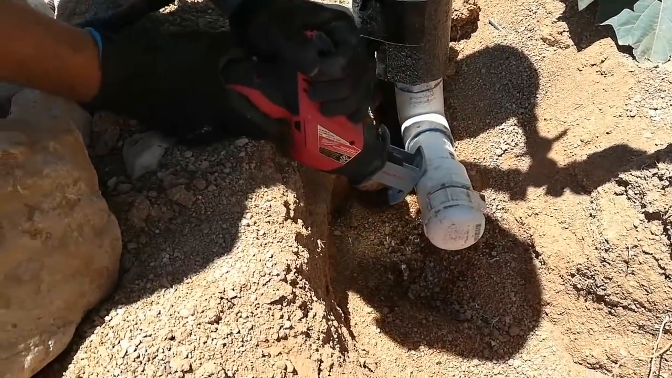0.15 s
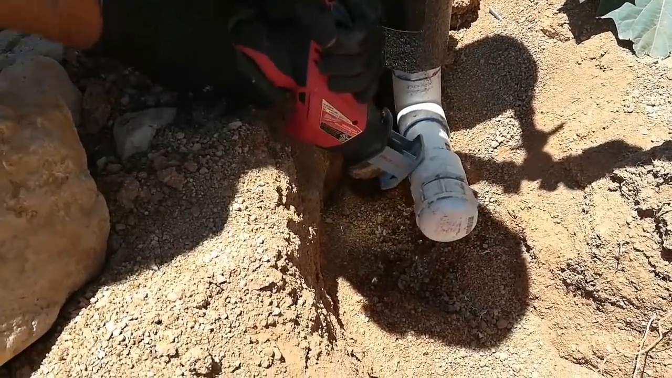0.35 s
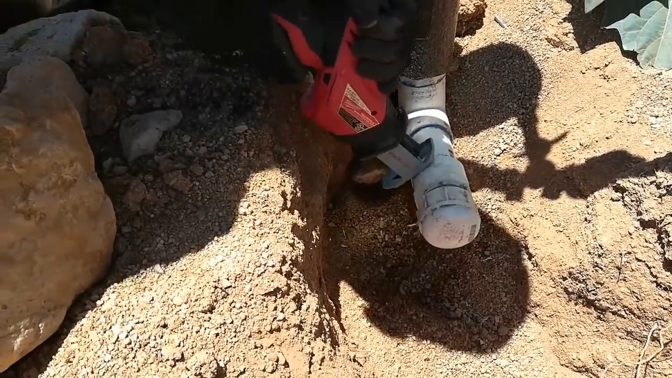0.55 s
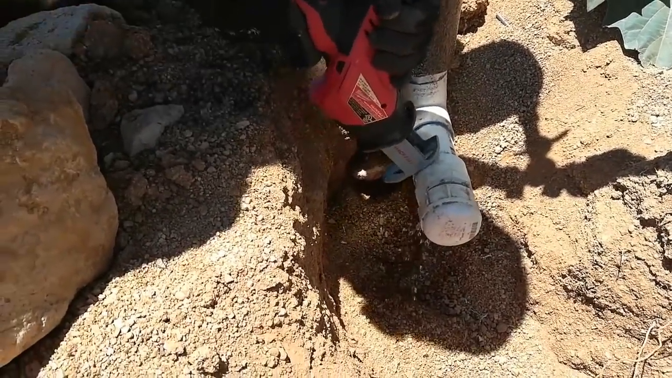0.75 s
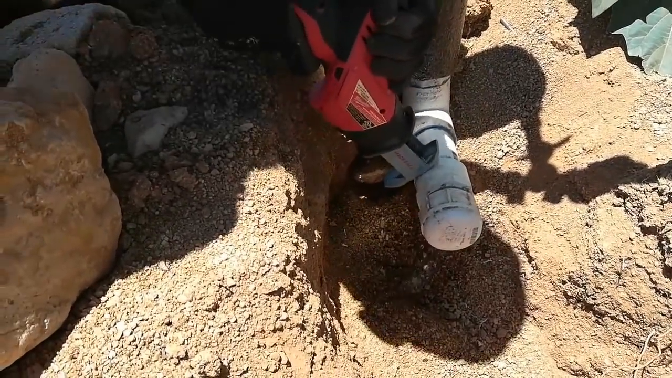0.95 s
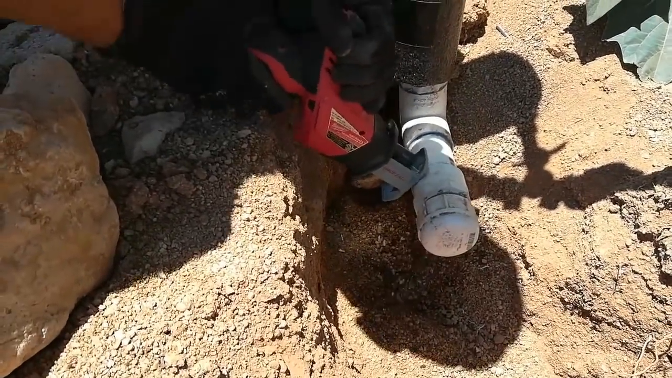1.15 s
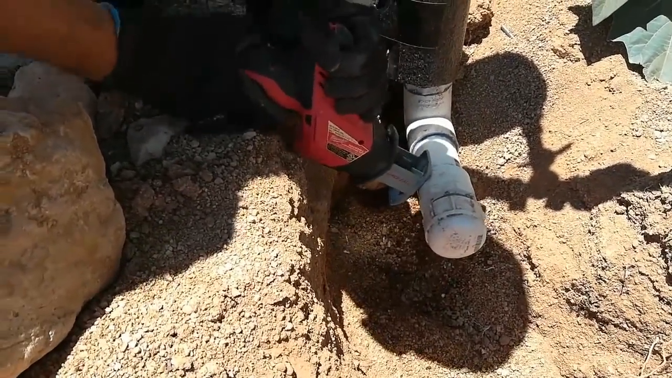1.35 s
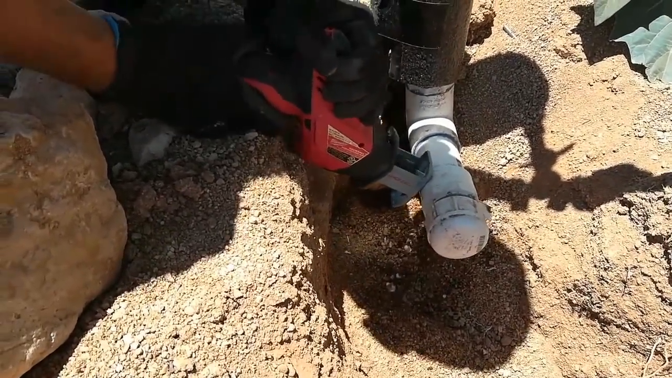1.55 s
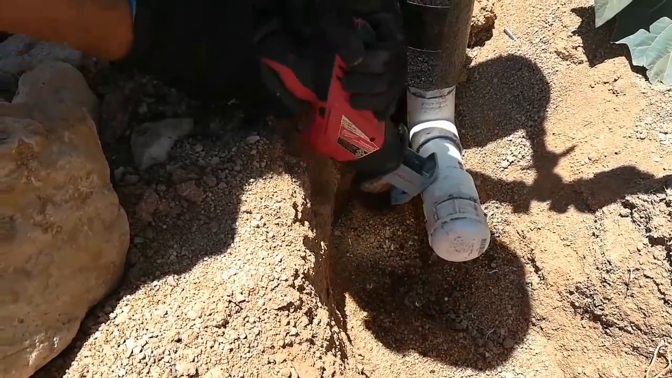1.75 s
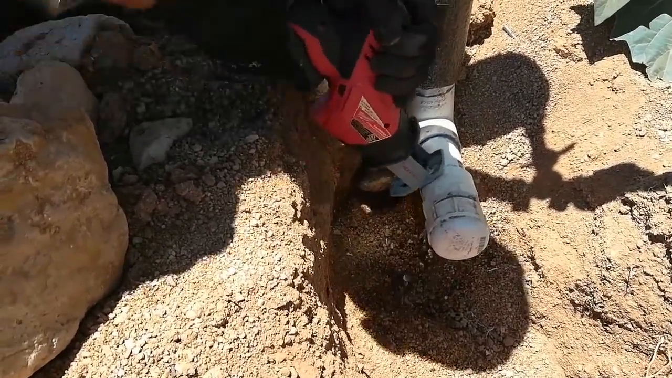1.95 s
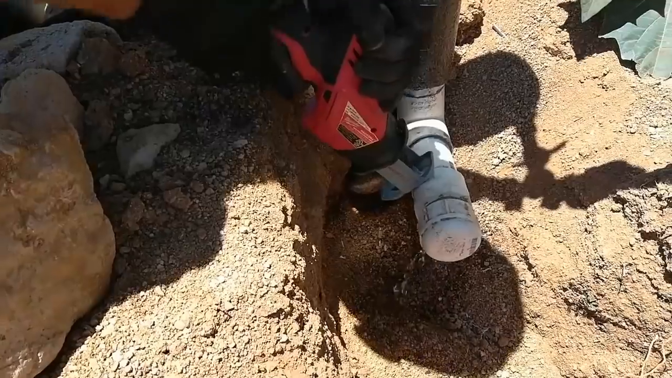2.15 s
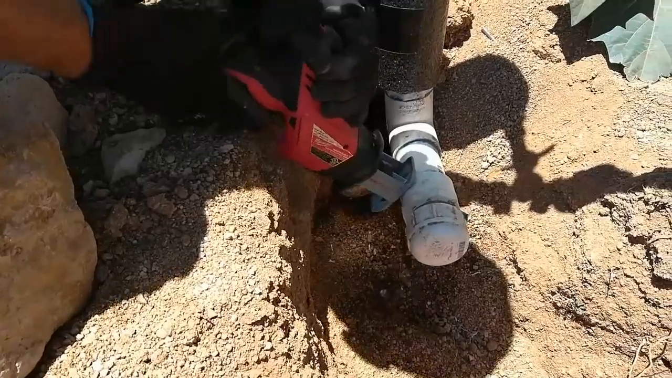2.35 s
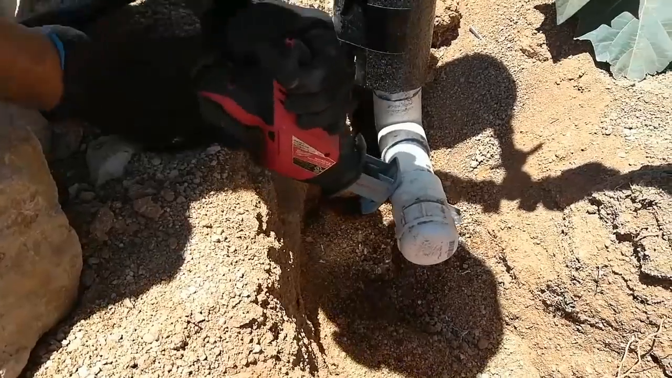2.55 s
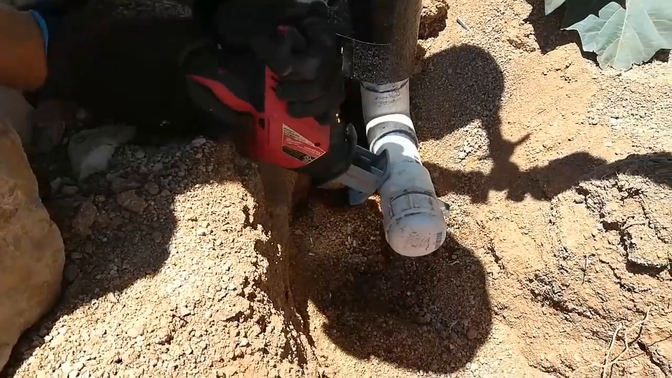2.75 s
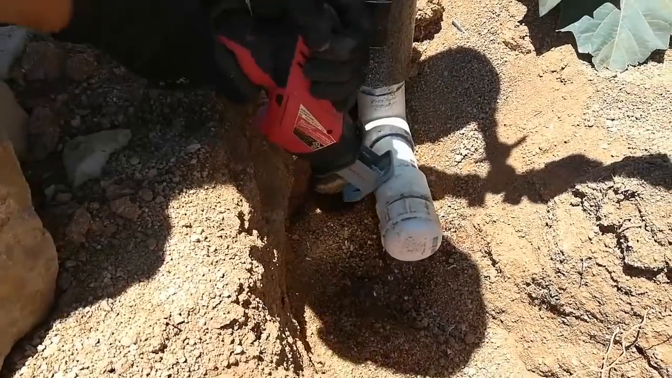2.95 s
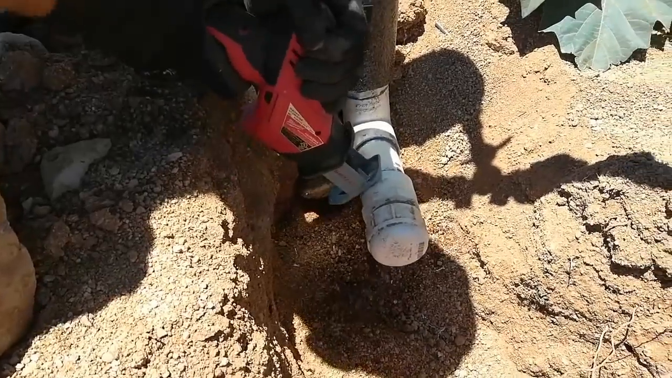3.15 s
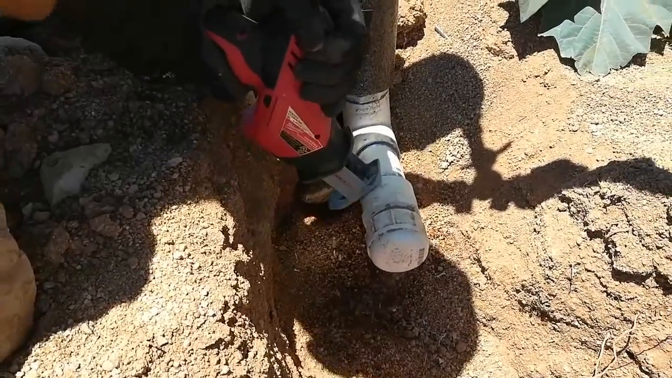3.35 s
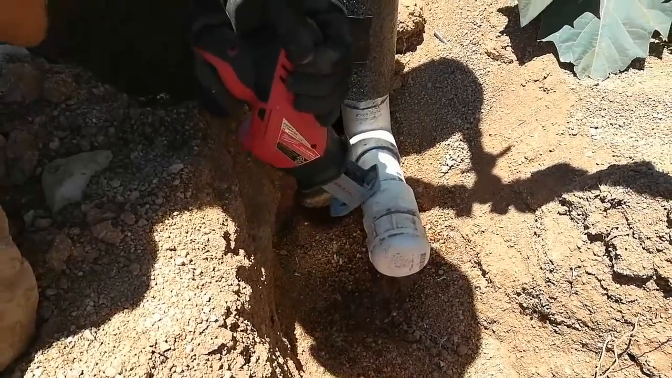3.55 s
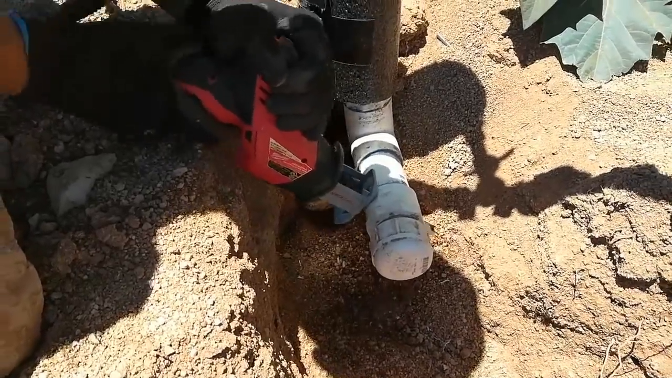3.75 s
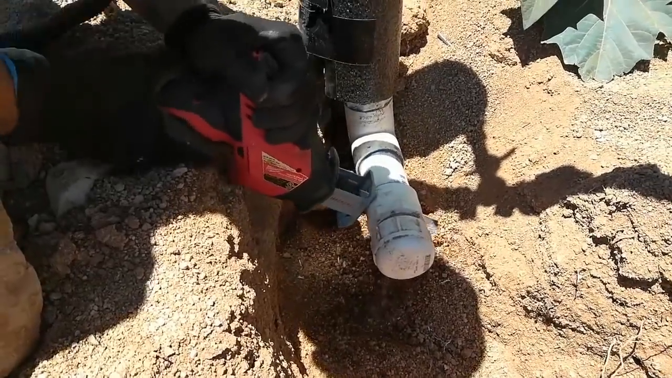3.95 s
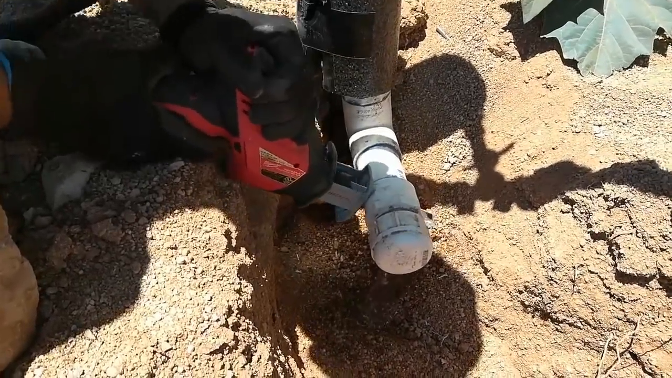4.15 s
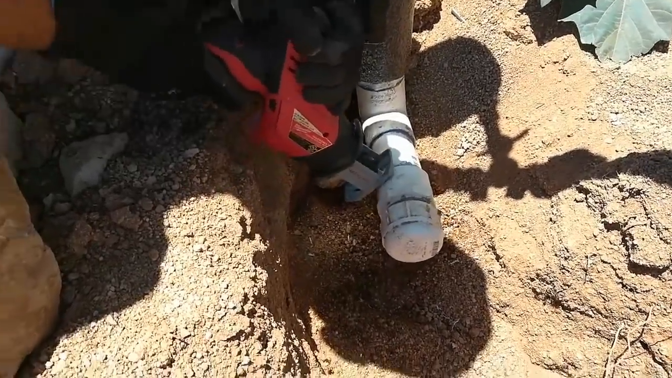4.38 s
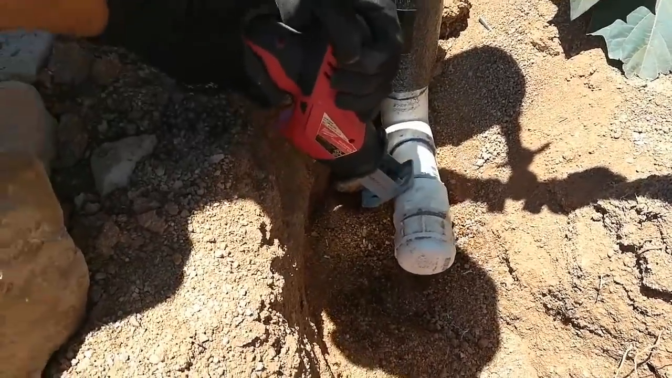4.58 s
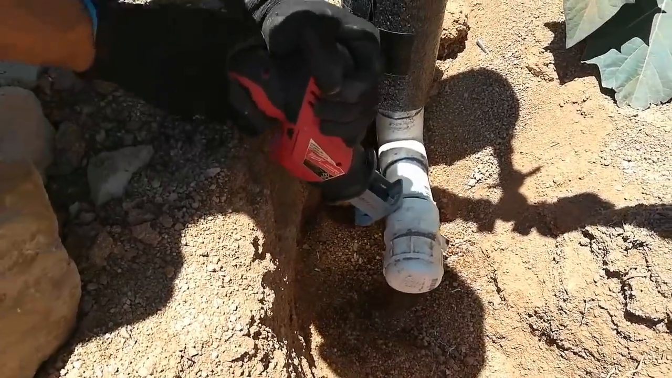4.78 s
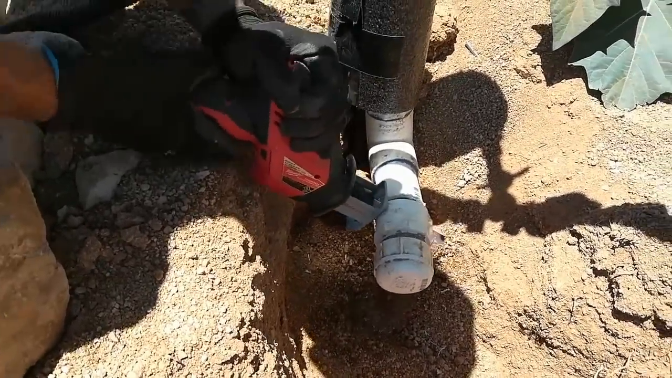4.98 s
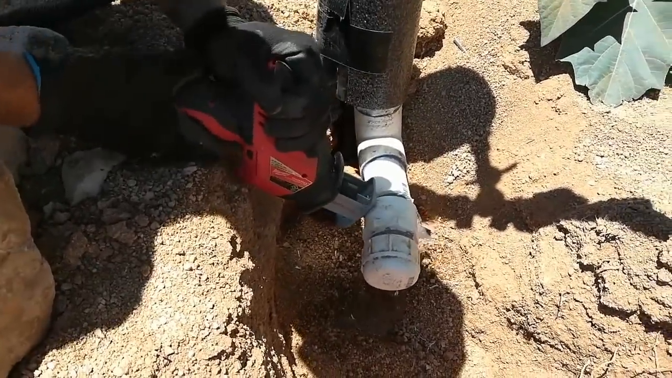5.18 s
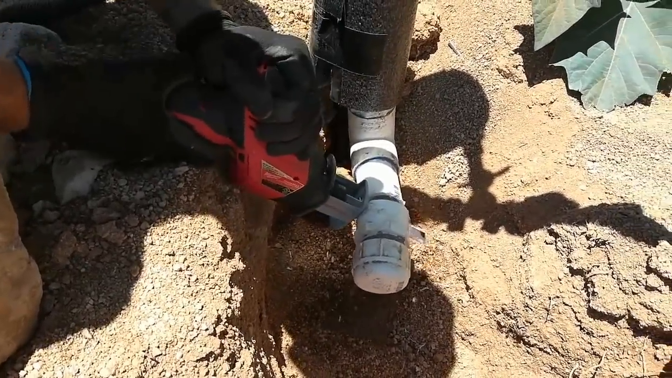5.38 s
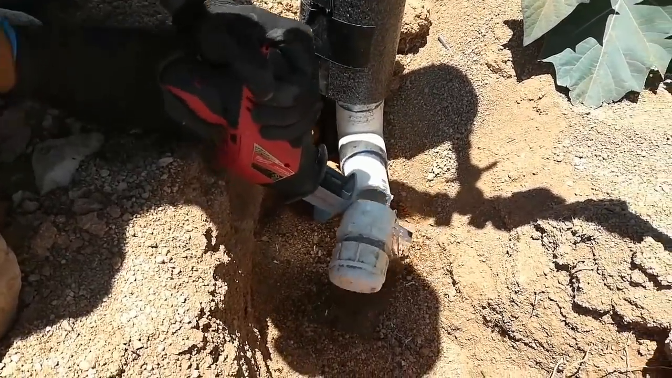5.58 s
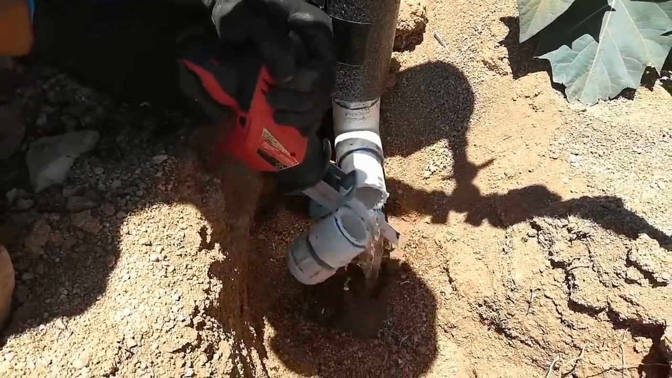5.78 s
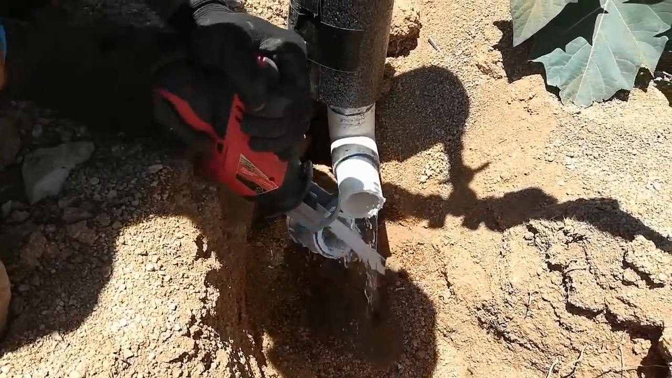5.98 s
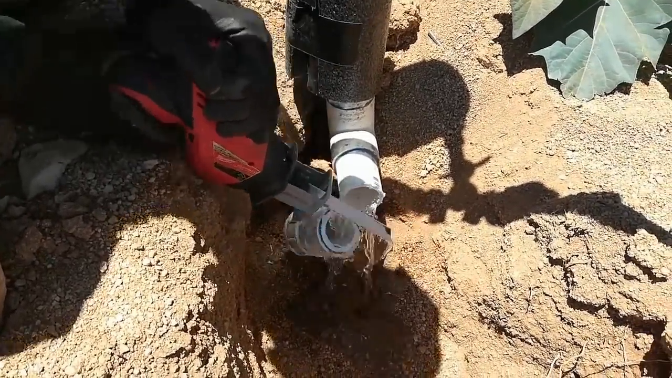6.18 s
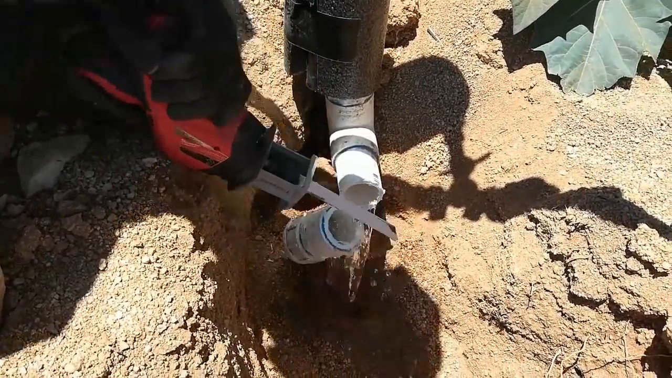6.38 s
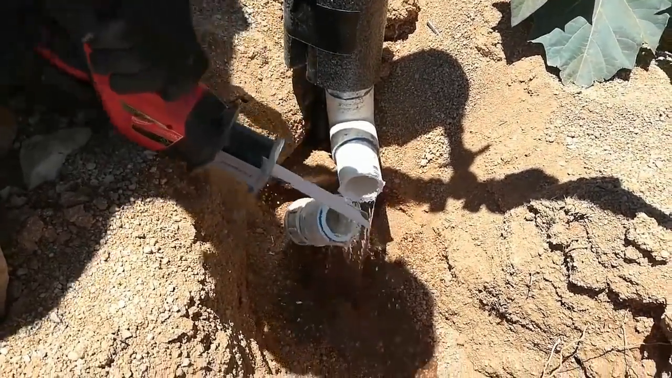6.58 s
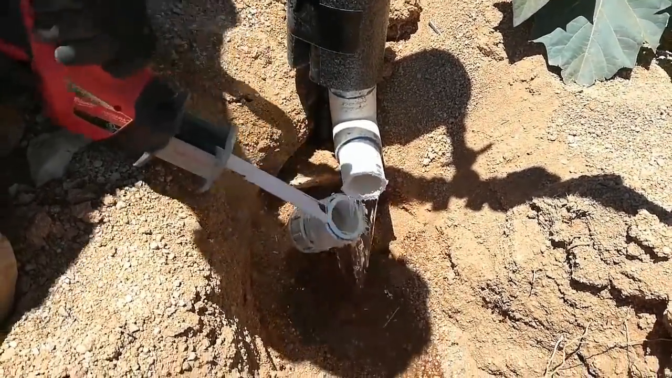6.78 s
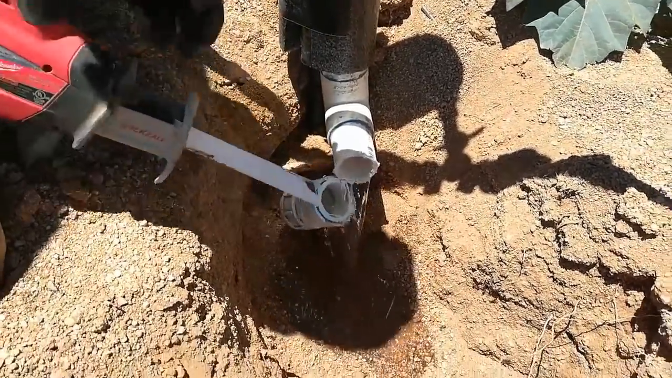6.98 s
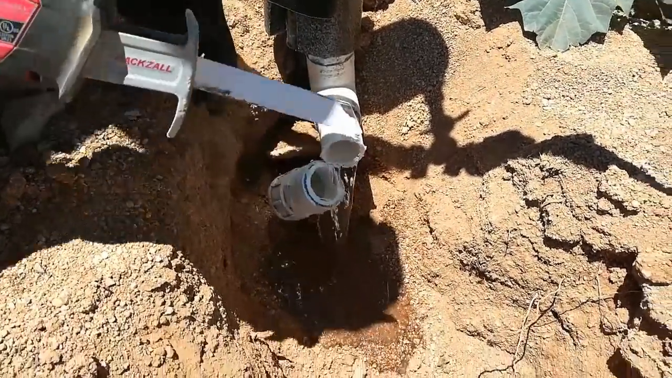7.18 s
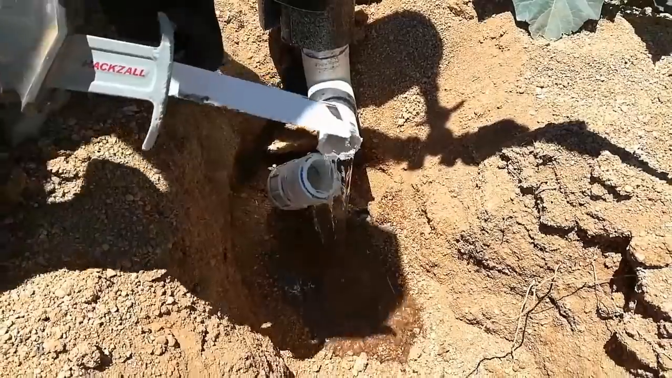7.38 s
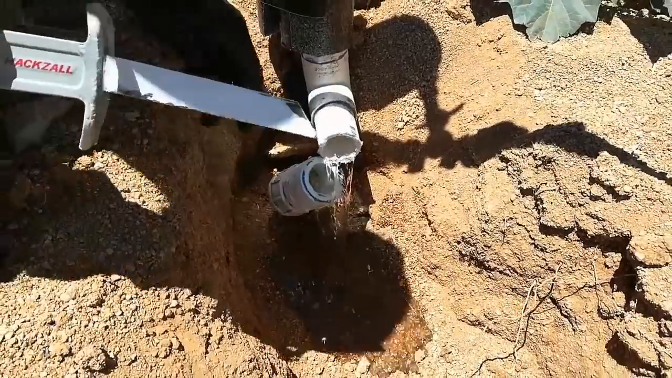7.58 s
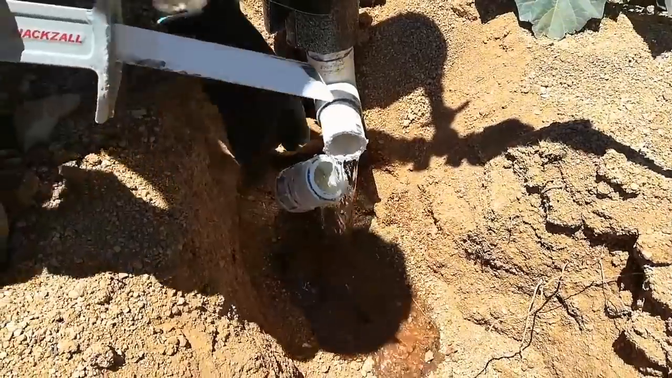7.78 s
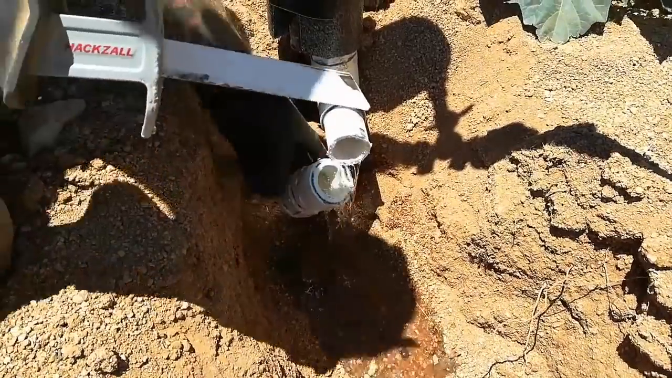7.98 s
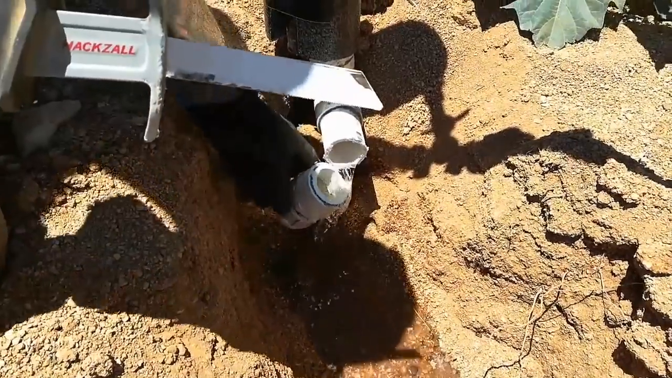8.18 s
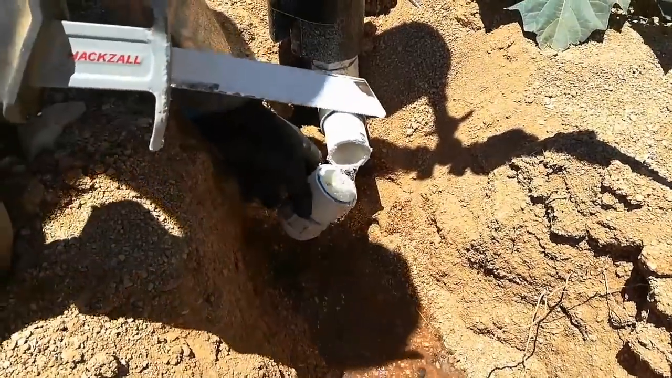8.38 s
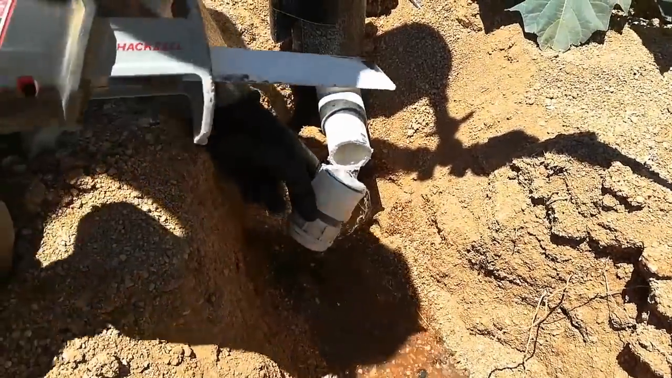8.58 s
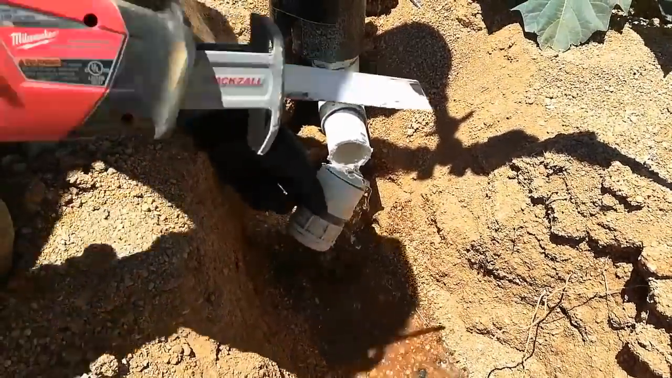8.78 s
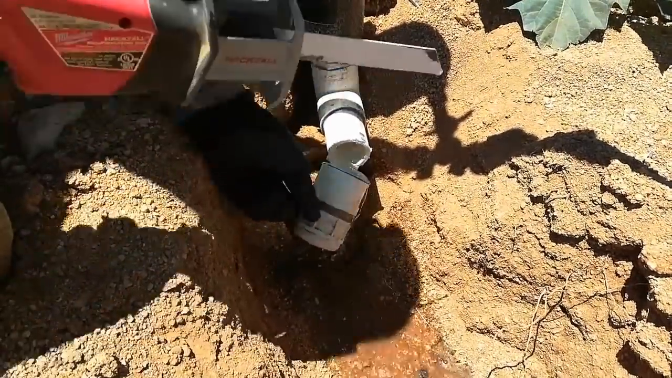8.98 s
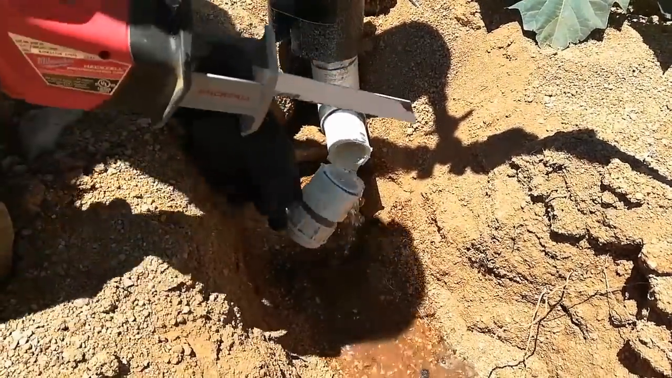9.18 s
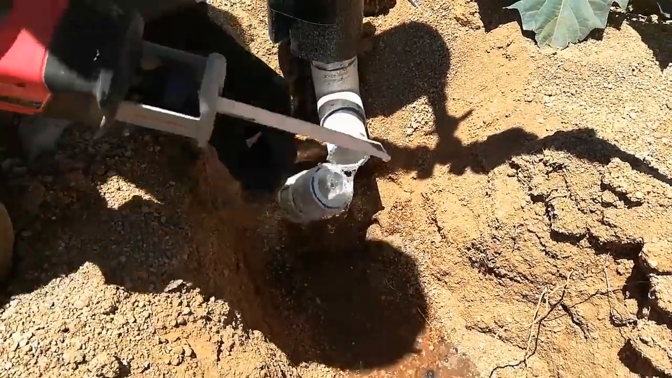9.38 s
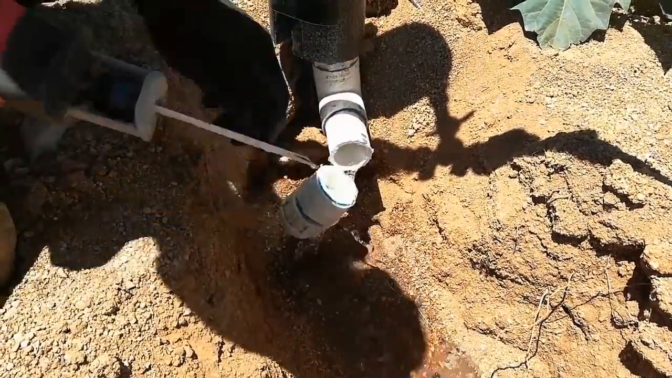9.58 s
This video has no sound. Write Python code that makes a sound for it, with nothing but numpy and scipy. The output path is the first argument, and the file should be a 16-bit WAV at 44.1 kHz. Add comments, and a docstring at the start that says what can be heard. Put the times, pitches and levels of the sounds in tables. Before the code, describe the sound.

A battery reciprocating saw rasps loudly through plastic pipe outdoors, dips once, breaks through and rattles to a stop; water dribbles and gritty handling follows.

```python
"""First you hear a battery reciprocating saw, close by outdoors, cutting through a plastic pipe. Its crank knocks
at both ends of each stroke, the blade slaps in the cut and its teeth rasp; noise and blows ring the tool and pipe.
It slows once, speeds up, breaks through and runs down. Then water dribbles on the soil as dense tiny contacts,
and the cut-off piece is picked up with short ringing taps and noisy scrapes. Puffs of low-pitched noise are
the air that buffets the microphone."""
import sys
import numpy as np
from scipy import signal
from scipy.fft import rfft, irfft, next_fast_len
from scipy.io import wavfile
from scipy.ndimage import uniform_filter1d, map_coordinates

SR = 44100
rng = np.random.default_rng(int(sys.argv[2]) if len(sys.argv) > 2 else 0)


def generate_wav(signal):
    """Clip the signal to [-1, 1] and save it as 16-bit WAV at the path in sys.argv[1]."""
    frames = np.transpose(np.atleast_2d(signal))
    scaled = np.clip(frames, -1, 1) * 32767
    pcm = np.round(scaled).astype(np.int16)
    wavfile.write(sys.argv[1], SR, pcm)


N = 424683
T = np.arange(N) / SR  # time of each sample in seconds
SIZE = 2 * next_fast_len(N // 2 + 8192)  # padded length for filtering
FREQS = np.fft.rfftfreq(SIZE, 1 / SR)


def amp(db):
    """Turn decibels into a gain."""
    return np.exp(np.asarray(db) * (np.log(10) / 20))


def unit(x):
    """Scale to rms 1; a stereo pair by its middle."""
    return x / np.sqrt(np.mean(np.atleast_2d(x).mean(0) ** 2) + 1e-20)


def curve(rows):
    """Draw straight lines between (time, value) rows, one value per sample."""
    s, values = np.transpose(rows)
    return np.interp(T, s, values)


def along(points, hz):
    """Join (frequency, value) points on a log frequency axis."""
    f, values = np.transpose(points)
    return np.interp(np.log(hz + 1), np.log(f + 1), values)


def ramp(start_s, length_s):
    """Rise from 0 to 1."""
    return np.clip((T - start_s) / length_s, 0, 1)


def decay(start_s, life_s):
    """Stay at 1, then die away."""
    return np.exp(-np.maximum(T - start_s, 0) / life_s)


def swell(s, length_s):
    """A bell that peaks at 1 at the given time."""
    return np.exp(-np.minimum((2 * (T - s) / length_s) ** 2, 50))


def wobble(rate):
    """A smooth random curve with about `rate` random points a second."""
    places = np.arange(0, N, 64) * rate / SR
    knots = map_coordinates(rng.standard_normal(4096), [places], mode="wrap")
    return np.interp(np.arange(N), np.linspace(0, N, len(knots)), knots)


def noise():
    """Two unrelated white noises."""
    return rng.standard_normal((2, N))


def spikes(times, sizes):
    """Single-sample blows at the given times."""
    places = np.clip(np.round(times * SR).astype(int), 0, N - 1)
    return np.bincount(places, sizes, N)


def filtered(x, response):
    """Pass x through a frequency response."""
    return irfft(rfft(x, SIZE) * response, SIZE)[..., :N]


def colour(points):
    """Causal (minimum-phase) response with the given (Hz, dB) outline."""
    cepstrum = irfft(np.log(amp(along(points, FREQS))))
    # fold the backward half onto the forward half, so nothing sounds before the blow
    cepstrum[1:SIZE // 2] *= 2
    cepstrum[SIZE // 2 + 1:] = 0
    return np.exp(rfft(cepstrum))


def resonances(modes):
    """Causal response of ringing (Hz, width Hz, dB) modes, with alternating signs."""
    total = 0
    for k, (hz, width, db) in enumerate(modes):
        damping = 1j * FREQS * width
        total = total + (-1) ** k * amp(db) * damping / (hz * hz - FREQS ** 2 + damping)
    return total


# how alike left and right sound: f/Hz, likeness (0 to 1)
LIKENESS = [(60, 0.964), (140, 0.736), (300, 0.355), (600, 0.08), (1200, 1), (2000, 0.636), (4000, 0.388),
            (8000, 0.038)]
# how far the sound leans to the left: f/Hz, left minus right level/dB
LEFT_LEAN = [(120, 3), (280, -2), (650, 4.5), (1300, 2.5), (2500, -0.5), (5000, 1.07), (9000, 0.06)]
TURN = np.arccos(np.clip(along(LIKENESS, FREQS), 0, 1)) / 2
MID_SIDE = np.array([np.cos(TURN), np.sin(TURN)])  # shares of direct and scattered sound
LEAN_DB = along(LEFT_LEAN, FREQS)


def stereo(pair, response, lean=1, lag_ms=0.0451):
    """Send direct and scattered sound through one response to both sides, rms 1; the left hears it first."""
    mid, side = rfft(pair, SIZE) * response * MID_SIDE
    tilt = amp(lean * LEAN_DB / 2) * np.exp(1j * np.pi * FREQS * lag_ms / 10 ** 3)
    return unit(irfft([(mid + side) * tilt, (mid - side) / tilt], SIZE)[:, :N])


def rattle(blows, ring_ms, clean):
    """Each blow is a sharp contact and a dying burst of tiny ones; only the burst is scattered."""
    keep = np.exp(-10 ** 3 / (ring_ms * SR))
    burst_level = np.sqrt(signal.lfilter([1 - keep], [1, -keep], blows ** 2))
    burst = burst_level * noise()
    clean = np.clip(clean, 0, 1)
    return np.array([np.sqrt(clean) * blows + np.sqrt(1 - clean) * burst[0], burst[1]])


def blend(hits, rubbing, share):
    """Mix blows and rubbing by their share of the power."""
    share = np.clip(share, 0, 1)
    return np.sqrt(share) * hits / hits.std() + np.sqrt(1 - share) * rubbing / rubbing.std()


def patchy(pair, depth_db, band_size, time_size):
    """Shifting contact favours now these, now those frequencies."""
    z = signal.stft(pair, nperseg=256)[2]
    field = uniform_filter1d(rng.standard_normal(z.shape[1:]), band_size, 0)
    field = uniform_filter1d(field, time_size, 1)
    return signal.istft(z * amp(depth_db * field / field.std()), nperseg=256)[1][:, :N]


def pings(rows, cycles, spread, click):
    """Each (s, dB, Hz) contact is a brief click that rings a few close, quickly dying modes."""
    out = np.zeros((2, N + SR))
    t = np.arange(SR // 25) / SR
    for s, db, centre in rows:
        detune = np.linspace(-1, 1, 5) + .2 * rng.standard_normal(5)
        hz = centre * np.exp(spread * detune)[:, None]
        modes = np.exp(2j * np.pi * hz * t - t * centre / cycles) * (1 - np.exp(-t * centre))
        burst = rng.standard_normal((2, len(t))) * np.exp(-t * centre / 3)
        band = [centre / 2, min(2.46 * centre, SR / 5.5)]
        contact = signal.sosfilt(signal.butter(4, band, "band", fs=SR, output="sos"), burst)
        mid = modes.imag.mean(0) + click * contact[0]
        side = rng.normal(0, 0.92, len(hz)) @ modes.real / len(hz) + click * contact[1]
        ping = np.array([mid + side, mid - side]) / np.abs(mid).max()
        out[:, round(s * SR):][:, :len(t)] += amp(db) * ping
    return out[:, :N]


# puffs of air on the microphone: t/s (at the peak), level/dB
AIR_PUFFS = [(6.8, -55), (7.16, -48.5), (7.36, -52.5), (7.51, -53.5), (7.659, -48.5), (7.84, -48.5),
             (8.14, -36.5), (8.29, -47.5), (8.83, -46), (8.98, -52), (9.32, -52), (9.46, -57.5)]
# outline of the low buffeting noise: f/Hz, relative level/dB (per Hz)
BUFFET_COLOUR = [(15, 0.5), (35, 3), (75, -2), (120, -10), (220, -45.5), (1000, -100)]
# outline of the flutter in the puffs: f/Hz, relative level/dB (per Hz)
FLUTTER_COLOUR = [(70, -3.5), (130, 4), (200, -5.5), (320, -17), (700, -45.5), (4000, -81.5)]
# outline of the still outdoor air: f/Hz, relative level/dB
STILL_AIR = [(30, -6.5), (150, -12), (1000, -25), (4000, -25.5), (15000, -36.5)]
PUFF_S, BREEZE_DB, AIR_DB = 0.1238, -58.5, -66.5  # puff length; light air between puffs; still air
FLUTTER_DB, FLUTTER_GROWS = -69.5, 1.96  # flutter in an average puff; dB per dB of strength


def wind():
    """Light air buffets the microphone in puffs; the stronger ones flutter, over quiet still air."""
    strength = amp(BREEZE_DB) + sum(amp(db) * swell(s, PUFF_S) for s, db in AIR_PUFFS)
    gust = strength / amp(np.mean(AIR_PUFFS, axis=0)[1])
    lumps_db = 2.04 * wobble(22)
    buffet = strength * amp(lumps_db) * stereo(noise(), colour(BUFFET_COLOUR), lean=0)
    flutter_gain = amp(FLUTTER_DB + lumps_db) * gust ** FLUTTER_GROWS
    flutter = flutter_gain * stereo(noise(), colour(FLUTTER_COLOUR), lean=0)
    still = amp(AIR_DB) * stereo(noise(), colour(STILL_AIR), lean=0)
    return buffet + flutter + still


# glove and pipe dragged through grit: t/s, length/s, grit level/dB, hollow pipe level/dB
GRIT_SCRAPES = [(8.38, 0.102, -61, -59), (8.639, 0.195, -54, -64.5), (8.844, 0.082, -54, -57),
                (8.922, 0.1384, -47.5, -85), (9.129, 0.191, -45.5, -57.5), (9.293, 0.0736, -46.5, -54),
                (9.388, 0.086, -51.5, -58.5)]
SCRAPE_ATTACK_S, SCRAPE_RELEASE_S = 0.0139, 0.0268
# water leaves the cut with a spurt that dies to a dribble: start, rise, extra level, fade time
WATER_S, WATER_RISE_S, SPURT_DB, SPURT_S = 6.3, 0.0877, 14.5, 0.187
# steady dribble on the soil; hollow sound of the emptying pipe at the start, and its fading
PATTER_DB, GURGLE_DB, GURGLE_FADE_DB_PER_S = -61, -62.5, 4


def contact_levels():
    """Gains of the gritty and the hollow sound: a spurt, a dribble, and each scrape on top."""
    water = ramp(WATER_S, WATER_RISE_S) * amp(SPURT_DB * decay(WATER_S + WATER_RISE_S, SPURT_S))
    emptying_db = GURGLE_FADE_DB_PER_S * (T - WATER_S)
    grit, hollow = water * amp(PATTER_DB), water * amp(GURGLE_DB - emptying_db)
    for s, length, grit_db, hollow_db in GRIT_SCRAPES:
        stroke = ramp(s, SCRAPE_ATTACK_S) * decay(s + length, SCRAPE_RELEASE_S)
        grit = np.hypot(grit, amp(grit_db) * stroke)
        hollow = np.hypot(hollow, amp(hollow_db) * stroke)
    return grit, hollow


# outline of the gritty sound: f/Hz, relative level/dB (per Hz)
GRIT_COLOUR = [(1500, -19.5), (2650, -9), (3050, 0), (4200, -1), (5200, -4), (6700, -2.5), (8000, -8.5),
               (10500, -17), (15500, -32.5)]
# outline of the hollow pipe sound: f/Hz, relative level/dB (per Hz)
HOLLOW_COLOUR = [(200, -19), (520, -21.5), (950, -4.5), (1320, 1.5), (1800, -5.5), (2200, 1.5), (2600, -18)]
DROP_DB, DROP_RANGE_DB = -54.5, 2.5  # the faintest drops, and how far the biggest rise above them


def dribble_and_scrape():
    """Dense tiny contacts: water pattering on soil, then glove and pipe dragged through grit."""
    grit_gain, hollow_gain = contact_levels()
    chance = rng.random((int(260 * N / SR), 2))  # 260 grains a second
    grains = spikes(chance[:, 0] * N / SR, amp(22.4 * chance[:, 1] ** 3))
    contacts = blend(rattle(grains, ring_ms=1.0, clean=0.44), noise(), 0.652)
    contacts = patchy(contacts, depth_db=3.5, band_size=4, time_size=6)
    grit = grit_gain * stereo(contacts, colour(GRIT_COLOUR), lean=-.2)
    hollow = hollow_gain * stereo(contacts, colour(HOLLOW_COLOUR), lean=0)
    # 110 small drops, each with a pitch of its own
    when, size, pitch = rng.random((110, 3)).T
    drop_s = np.interp(when, [0, 1], [6.5, 9.5])
    drop_db = DROP_DB + DROP_RANGE_DB * size ** 3
    drop_hz = 1200 * 6 ** np.sqrt(pitch)
    drops = np.column_stack([drop_s, drop_db, drop_hz])
    return grit + hollow + pings(drops, cycles=19.2, spread=0.053, click=0.11)


# ticks of grit, drops and plastic: t/s, peak level/dB, centre f/Hz
SHARP_TICKS = [(6.561, -38, 3570), (6.594, -35.5, 6800), (6.686, -33.5, 6430), (6.747, -38, 3480),
               (6.838, -44, 3620), (6.901, -37.5, 3190), (7.119, -44, 3396), (7.289, -45, 3770),
               (7.400, -42, 3610), (7.791, -37.5, 7180), (8.064, -34, 3710), (8.482, -36, 5310),
               (8.640, -41, 4170), (8.749, -33, 3240), (8.795, -28, 3450), (9.027, -29, 6160),
               (9.126, -25, 6130), (9.274, -30.5, 3720), (9.354, -25.5, 3540), (9.410, -26, 4785),
               (9.436, -26, 5060)]
# hollow taps on the loose piece, and a last plastic click: t/s, peak level/dB, centre f/Hz
TAPS_AND_CLICK = [(7.463, -36.5, 1400), (7.911, -42.5, 1415), (8.096, -39, 1240), (8.399, -42.5, 1310),
                  (8.423, -36, 1207), (8.726, -42, 1172), (8.823, -41, 1210), (8.855, -40.5, 1063),
                  (8.894, -32, 1274), (8.907, -40.5, 1483), (8.931, -41.5, 1420), (9.065, -37.5, 2130),
                  (9.405, -36.5, 1250), (9.5985, -31, 2690)]
# the piece bumps dully on the ground: t/s, peak level/dB, centre f/Hz
DULL_BUMPS = [(8.894, -45, 500), (9.366, -40, 229)]


def ticks():
    """Sharp ticks ring for many cycles, taps for fewer, dull bumps for very few."""
    sharp = pings(SHARP_TICKS, cycles=16.9, spread=0.091, click=0.263)
    taps = pings(TAPS_AND_CLICK, cycles=5.3, spread=0.126, click=0.28)
    bumps = pings(DULL_BUMPS, cycles=2.9, spread=0.24, click=.05)
    return sharp + taps + bumps


def scaled_to_loudest(sound, db):
    """Set the peak of the middle to the level of the loudest blow."""
    return sound / np.abs(sound.mean(0)).max() * amp(db.max())


# the slack crank clacks as the saw runs down, and the blade bumps the pipe: t/s, peak level/dB
RUNDOWN_KNOCKS = [(6.175, -19.5), (6.194, -22), (6.208, -18), (6.225, -20.5), (6.242, -21.5), (6.264, -21),
                  (6.284, -24.5), (6.311, -24), (6.339, -27), (6.376, -30.5), (6.423, -25), (6.439, -30),
                  (6.502, -34), (6.519, -33.5)]
# the tones these knocks ring: f/Hz, width/Hz, relative level/dB
RUNDOWN_MODES = [(956, 210, -3.5), (1362, 202, -3), (1604, 510, -10.5), (2173, 210, -4), (3630, 810, -14.5)]


def knocks():
    """Short, hollow knocks of the slowing saw and of its blade against the pipe."""
    s, db = np.transpose(RUNDOWN_KNOCKS)
    blows = rattle(spikes(s, amp(db)), ring_ms=2.5, clean=.75)
    return scaled_to_loudest(stereo(blows, resonances(RUNDOWN_MODES), lean=1.0), db)


# outline of the tearing hiss: f/Hz, relative level/dB (per Hz)
TEAR_COLOUR = [(1000, -44), (3800, 0), (5500, -6.5), (8000, 2.5), (10500, -9.5), (15500, -17.5)]
TEAR_S, TEAR_RISE_S, TEAR_FALL_S, TEAR_DB = 5.9, 0.1, 0.081, -37.5  # the last of the pipe wall tears


def tear():
    """A soft, bright hiss swells as the blade breaks through the pipe wall."""
    level = amp(TEAR_DB) * ramp(TEAR_S, TEAR_RISE_S) * decay(TEAR_S + TEAR_RISE_S, TEAR_FALL_S)
    return level * stereo(noise() * amp(2.6 * wobble(300)), colour(TEAR_COLOUR))


# the blade snags in the cut: t/s, peak level/dB
BLADE_SNAGS = [(1.216, -30), (1.244, -21), (2.568, -22), (3.226, -11.5), (4.605, -12), (6.0685, -18)]


def snags():
    """Now and then a tooth catches and the blade cracks against the cut."""
    s, db = np.transpose(BLADE_SNAGS)
    blows = rattle(spikes(s, amp(db)), ring_ms=1.3, clean=0.76)
    return scaled_to_loudest(stereo(blows, colour(BLADE_COLOUR) + resonances(BLADE_TONES)), db)


EASE_S, SQUEEZE_S, RELEASE_S = 0.9824, 1.19, 6.12  # the trigger is eased, squeezed again, let go
EASED_SHARE, SPIN_UP_S, COAST_S = .49, .03, .25  # speed share when eased; time constants
DRAG = .17  # dry friction as a share of full speed


def coast(start_s):
    """Friction slows the motor to a dead stop."""
    return np.maximum((1 + DRAG) * decay(start_s, COAST_S) - DRAG, 0)


def motor():
    """Share of full speed: the motor coasts when the trigger is eased or let go, and picks up fast."""
    first = np.maximum(coast(EASE_S), EASED_SHARE)
    second = 1 - (1 - EASED_SHARE) * decay(SQUEEZE_S, SPIN_UP_S)
    return np.where(T < SQUEEZE_S, first, second) * coast(RELEASE_S)


# tones of the gear case: f/Hz, width/Hz, relative level/dB
GEAR_CASE = [(381.5, 44.6, -8.5), (577.5, 45.6, -2.5), (692.3, 47.5, 0), (759.7, 38.2, 3)]
GEAR_DB, GEAR_FADE_DB_PER_S = -40.5, 1.423  # level at the start; the hum sinks as the cut deepens


def gears(phase, pace):
    """The load on the gears peaks once a stroke and keeps the case humming on multiples of its rate."""
    times = np.interp(np.arange(1, int(phase[-1]) + 1), phase, T)
    loads = np.array([spikes(times, np.ones(len(times))), np.zeros(N)])
    level = amp(GEAR_DB - GEAR_FADE_DB_PER_S * T + 0.72 * wobble(6)) * pace ** 2
    return level * stereo(loads, resonances(GEAR_CASE))


FREEING_S, FREE_SHAKE_DB = 0.323, -10  # out of the cut, the judder sinks by this much over this time
# level of the shaking: t/s, level/dB
SHAKE_LEVEL = [(0, -45.5), (.7, -50.5), (1.25, -43.5), (1.45, -43), (1.85, -45.5), (2.15, -52.5),
               (2.3, -44.5), (5.35, -47.5), (5.85, -45.5), (6.05, -56)]
# tones of the shaking: multiple of the stroke rate, level/dB (against the shaking)
SHAKE_ORDERS = [(1, -19), (3, -5), (4, -6.5), (5, 0), (6, -6), (7, -8.5), (8, -15.5)]
# as the grip shifts, one tone swells: t/s (at the peak), multiple of the stroke rate, level/dB
GRIP_SWELLS = [(.4, 3, -46), (.92, 5, -40.5), (1.58, 5, -38), (1.8, 7, -41), (1.88, 4, -40.5),
               (2.68, 3, -44), (2.97, 4, -43), (4.7, 3, -45), (5.26, 5, -41.5), (5.42, 3, -40.5)]
SWELL_S = 0.295
# thump at twice the stroke rate: t/s, level/dB
THUMP_LEVEL = [(0, -63.5), (.35, -45.5), (.55, -55.5), (1.62, -60.5), (1.8, -44), (2.1, -50.5), (4.7, -39),
               (5.25, -43), (5.8, -49.5), (6, -56.5)]
# outline of the noisy judder: f/Hz, relative level/dB (per Hz)
JUDDER_COLOUR = [(20, -33), (60, -11), (110, -8.5), (230, -1), (320, -8), (450, -24.5), (900, -54)]


def stroke_tone(phase, multiple, waver):
    """A wavering tone of rms 1 at a multiple of the stroke rate."""
    turns = multiple * phase + rng.random()
    return np.sqrt(2) * np.sin(2 * np.pi * turns + waver * wobble(11))


def shaking(phase, pace):
    """The moving mass shakes tool and pipe at multiples of the stroke rate; tones swell with the grip."""
    shake_db = curve(SHAKE_LEVEL)
    hum = 0
    for k, db in SHAKE_ORDERS:
        swelling = sum(amp(peak_db) * swell(s, SWELL_S) for s, multiple, peak_db in GRIP_SWELLS
                       if round(multiple) == round(k))
        level = np.hypot(amp(shake_db + db + 3.82 * wobble(9)), swelling)
        hum = hum + level * stroke_tone(phase, k, 0.755)
    thump = amp(curve(THUMP_LEVEL) + 0.99 * wobble(8)) * stroke_tone(phase, 2, 0.21)
    judder_gain = amp(shake_db + FREE_SHAKE_DB * ramp(RELEASE_S, FREEING_S))
    judder = judder_gain * stereo(noise(), colour(JUDDER_COLOUR))
    # the shaking force grows with the square of the speed
    return pace ** 2 * (hum + thump) + np.sqrt(pace) * judder


def reversals(phase, back, place, jitter_ms, scatter_db, bounce, bounce_ms):
    """A blow at each end of the stroke, each followed by a bounce in the play of the joints."""
    cycles = np.arange(1, int(phase[-1]) + 1)
    out = np.interp(cycles, phase, T)
    home = np.interp(cycles + np.interp(out, T, place), phase, T)
    weak = np.interp(out, T, back)
    times = np.concatenate([out, home])
    chance = rng.standard_normal((len(times), 4))
    # a blade that bites evenly both ways also rattles more freely
    freedom = np.tile(weak, 2)
    times = times + freedom * jitter_ms * chance[:, 0] / 10 ** 3
    sizes = np.concatenate([np.ones(len(out)), weak]) / np.hypot(1, freedom)
    sizes = sizes * amp(scatter_db * freedom * np.minimum(chance[:, 1], 1))
    later = times + bounce_ms / 10 ** 3 * np.exp(.3 * freedom * chance[:, 2])
    return spikes(times, sizes) - spikes(later, bounce * sizes * amp(2.1 * chance[:, 3]))


# teeth that cross the wall each way; spread of their bites; their share of the rasp
TEETH_PER_PASS, TOOTH_SCATTER_DB, TOOTH_SHARE = 13, 3.5, 0.397


def rasp(phase):
    """Tooth after tooth bites the wall, fastest in mid-stroke, over the hiss of the rubbing blade."""
    speed = np.abs(np.sin(2 * np.pi * phase))
    passed = np.cumsum(np.pi * TEETH_PER_PASS * speed * np.gradient(phase))
    times = np.flatnonzero(np.diff(np.floor(passed))) / SR
    chance = rng.standard_normal((len(times), 3))
    sizes = np.sign(chance[:, 1]) * amp(TOOTH_SCATTER_DB * np.clip(chance[:, 2], -2, 1.5))
    bites = spikes(times + .0003 * chance[:, 0], sizes)
    rubbing = noise() * amp(0.27 * wobble(400))
    return blend(rattle(bites, ring_ms=0.323, clean=0.944), rubbing, TOOTH_SHARE)


def bend(pair, edge_hz, spread_ms):
    """A blow on plastic lacks top treble and runs along the blade as a bending wave, high notes first."""
    lag = spread_ms / 10 ** 3 * (2 * np.sqrt(FREQS * edge_hz) - FREQS)
    return filtered(pair, np.exp(-2j * np.pi * lag) / np.sqrt(1 + (FREQS / edge_hz) ** 6))


def sliding(drive, rows, width_hz):
    """Each (s, length, start Hz, end Hz, dB) row is a sliding resonance that swells as it is driven."""
    out = np.zeros((2, N))
    keep = np.exp(-np.pi * width_hz / SR)
    for s, length, start_hz, end_hz, db in rows:
        n = np.arange(max(int((s - length) * SR), 0), int((s + length) * SR))
        hz = np.interp(n / SR, [s - length / 2, s + length / 2], [start_hz, end_hz])
        turn = np.exp(2j * np.pi * np.cumsum(hz) / SR)
        # shift the sliding pitch down to zero, keep what is near it, shift back up
        ring = (signal.lfilter([1], np.poly([keep, keep]), drive[:, n] / turn) * turn).real
        out[:, n] += amp(db) * swell(s, length)[n] * ring / ring.std()
    return out[0].std() * stereo(out, 1)


# outline of the housing: f/Hz, relative level/dB (per Hz)
HOUSING_COLOUR = [(250, -27), (420, -9.5), (560, -6), (750, -1.96), (870, -6.5), (1050, -0.5), (1280, 3),
                  (1480, 1.5), (1720, 4.5), (2000, -4), (2350, -6.5), (2900, -5.5), (3400, -13.5),
                  (5000, -32.5)]
# tones of the nearly severed pipe: f/Hz, width/Hz, relative level/dB
PIPE_TONES = [(1250, 38, 18.5), (1591, 228, 10.5), (2130, 200, 11.5)]
HOUSING_DB, HOUSING_POWER = -30.5, 0.375  # level at full speed, before the feed; power of the speed
# the nearly severed pipe starts to ring: its level against the housing before and after
LOOSE_S, LOOSENING_S, HELD_DB, LOOSE_DB = 4.723, 0.72, -29.5, -7.5


def housing_and_pipe(body, feed_db, pace):
    """Crank knocks and rasp ring the housing, and a moment later the pipe."""
    loose = amp(HELD_DB + (LOOSE_DB - HELD_DB) * ramp(LOOSE_S, LOOSENING_S))
    delayed = np.roll(body, int(SR / 1500), axis=1)
    pipe = loose * stereo(delayed, resonances(PIPE_TONES))
    both = stereo(body, colour(HOUSING_COLOUR), lean=1.253) + pipe
    return both / np.hypot(1, loose) * amp(HOUSING_DB + feed_db) * pace ** HOUSING_POWER


# outline of the blade's hiss: f/Hz, relative level/dB (per Hz)
BLADE_COLOUR = [(2000, -23.5), (2900, -1), (4300, 3), (4900, 0.5), (5500, 0.5), (6300, 5), (6900, -1),
                (7500, -5), (9500, -8), (10500, -16), (15500, -27.5)]
# tones of the blade: f/Hz, width/Hz, relative level/dB
BLADE_TONES = [(3831.2, 191.4, 15), (4170, 186, 14.5)]
# level of the blade's ring: t/s, level/dB (at full speed)
RING_LEVEL = [(0, -36.5), (.55, -33), (1.27, -33.5), (1.57, -37.5), (1.9, -34.5), (2.57, -38.5),
              (3.1, -34.5), (4.25, -41), (4.58, -33), (5, -38.5), (5.8, -51), (6.05, -37.5)]
HISS_DB, HISS_PER_FEED = -36, 0.081  # level at full speed, before the feed; dB of hiss per dB of feed
RING_POWER, HISS_POWER = 0.3, 0.476  # each level goes with this power of the speed


def ringing_blade(steel, feed_db, pace):
    """Slaps and rasp ring the blade's tones and make it hiss."""
    ring = amp(curve(RING_LEVEL)) * pace ** RING_POWER * stereo(steel, resonances(BLADE_TONES))
    hiss_gain = amp(HISS_DB + HISS_PER_FEED * feed_db) * pace ** HISS_POWER
    return ring + hiss_gain * stereo(steel, colour(BLADE_COLOUR))


# how hard the blade is fed into the pipe: t/s, level/dB
FEED_LEVEL = [(0, 1), (1.05, -.5), (1.35, 1.5), (1.57, 3), (1.8, 0.9), (2.8, 1), (3.35, -0.5), (4.15, .5),
              (4.9, -0.5), (5.5, 2.5), (5.9, 1), (6.05, 1.2)]
# bursts in which the blade chatters in the cut: t/s (at the peak), length/s, rise/dB
CHATTER_BURSTS = [(0.545, 0.252, 2.5)]
# colour of the housing before the saw settles: f/Hz, level/dB
UNSEATED_COLOUR = [(250, -1.5), (450, -4.5), (1700, 0.5), (2300, -3.5), (2800, 2)]
# as the blade twists, each slap rings it higher: t/s (at the peak), length/s, start f/Hz, end f/Hz, level/dB
BLADE_SQUEALS = [(0.694, 0.238, 5760, 5990, -33), (2.628, 0.31, 5070, 5380, -37)]
# pipe wall howling under a hard feed, sliding with the cut: t/s (at the peak), length/s, start f/Hz,
# end f/Hz, level/dB
PIPE_HOWLS = [(0.928, 0.25, 1585, 1645, -34), (1.512, 0.314, 1242, 1097, -31.5)]
SQUEAL_WIDTH_HZ, HOWL_WIDTH_HZ = 820, 95
SEAT_S, SEATING_S = .835, 0.031  # the saw settles against the pipe; the blade then bites both ways
# before and after settling: slap share of the blade, knock share of the housing, strength of the return blow
SLAP, KNOCK, RETURN_BLOW = (0.388, 0.258), (0.383, 0.6416), (.12, .9)
# where in the cycle the return blows of crank and blade fall, and their drift
CRANK_RETURN, BLADE_RETURN, RETURN_WANDER = .36, .5, .015
FREE_BLADE_DB, FREE_HOUSING_DB = -10, -12  # out of the cut, the saw runs quieter
LIFT_S = 0.302  # the blade is lifted clear of the pipe


def saw(phase, pace):
    """Crank knocks ring the housing and pipe, slaps ring the blade, and the teeth rasp in between."""
    feed_db = curve(FEED_LEVEL)
    chatter = amp(sum(db * swell(s, length) for s, length, db in CHATTER_BURSTS))
    seated = ramp(SEAT_S, SEATING_S)
    slap, knock, back = (np.interp(seated, [0, 1], pair) for pair in (SLAP, KNOCK, RETURN_BLOW))
    # the rasp fades as the saw slows, and chatter adds mostly slaps
    slap = 1 - (1 - slap) * np.sqrt(pace) / chatter
    knock = 1 - (1 - knock) * np.sqrt(pace)
    drift = RETURN_WANDER * wobble(5)
    crank_blows = reversals(phase, back, CRANK_RETURN + drift, jitter_ms=0.2317, scatter_db=1.5,
                            bounce=0.38, bounce_ms=2.8415)
    blade_blows = reversals(phase, back, BLADE_RETURN + drift, jitter_ms=.5, scatter_db=4.0,
                            bounce=0.187, bounce_ms=3.1)

    body = blend(rattle(crank_blows, ring_ms=2.98, clean=0.534), rasp(phase), knock)
    body = patchy(body, depth_db=1.0, band_size=3, time_size=30)
    body = seated * body + (1 - seated) * filtered(body, colour(UNSEATED_COLOUR))

    slaps = bend(rattle(blade_blows, ring_ms=1.605, clean=0.568), edge_hz=6400, spread_ms=2.2)
    steel = blend(slaps, rasp(phase), slap)
    steel = patchy(steel, depth_db=1.48, band_size=4, time_size=40)

    housing_gain = amp(FREE_HOUSING_DB * ramp(RELEASE_S, FREEING_S))
    blade_gain = amp(FREE_BLADE_DB * ramp(RELEASE_S, LIFT_S)) * chatter
    squeals = sliding(rattle(blade_blows, ring_ms=0.93, clean=0.18), BLADE_SQUEALS, SQUEAL_WIDTH_HZ)
    howls = sliding(body[::-1], PIPE_HOWLS, HOWL_WIDTH_HZ)  # direct and scattered parts swapped
    housing = housing_gain * housing_and_pipe(body, feed_db, pace)
    return housing + blade_gain * ringing_blade(steel, feed_db, pace) + squeals + howls


# stroke rate with the trigger fully in: t/s, f/Hz (strokes a second)
FULL_SPEED = [(0, 42.27), (.2, 42.06), (.4, 41.27), (.65, 42.83), (1.1, 42.31), (1.5, 45.11), (2.3, 44.43),
              (2.6, 45.99), (3.3, 44.54), (4.15, 46.7), (4.6, 44.78), (5.2, 46.81)]
# the tool swings in the hand: t/s, left minus right level/dB
HAND_SWAY = [(0, 1), (.75, 0), (1.2, 0.5), (2.2, -0.42), (3.25, 0.32), (3.9, 0.5), (4.7, -1), (6.1, 0.5)]


def scene():
    """One crank drives the running sounds of the saw; wind, water and handling join them."""
    pace = motor()
    phase = np.cumsum(curve(FULL_SPEED) * pace) / SR + .12  # strokes made so far
    tool = saw(phase, pace) + shaking(phase, pace) + gears(phase, pace)
    sway_db = curve(HAND_SWAY)
    tool = tool * amp(np.array([sway_db, -sway_db]) / 2)
    return wind() + dribble_and_scrape() + ticks() + knocks() + tear() + snags() + tool


def record(dry):
    """Keep nothing above the microphone's band limit of 15750 Hz."""
    return filtered(dry, FREQS < 15750)


dry = scene()
out = record(dry)
generate_wav(out)
```